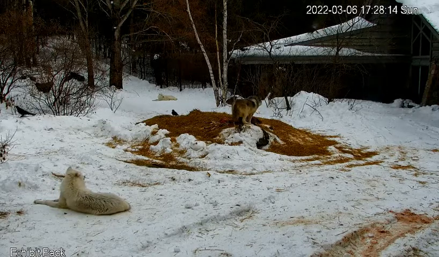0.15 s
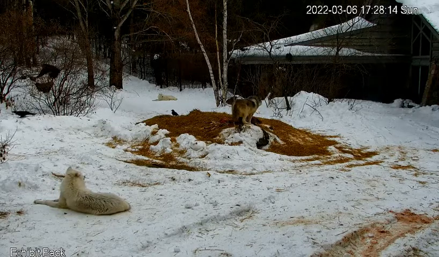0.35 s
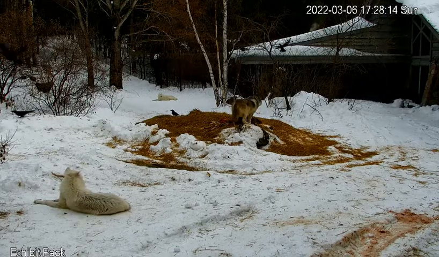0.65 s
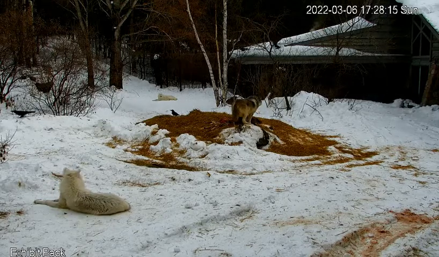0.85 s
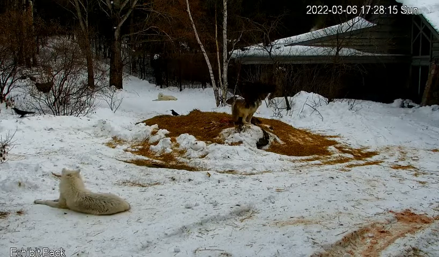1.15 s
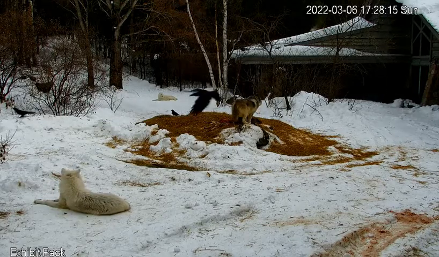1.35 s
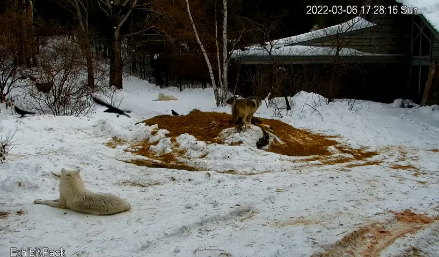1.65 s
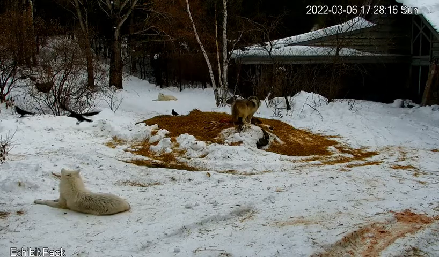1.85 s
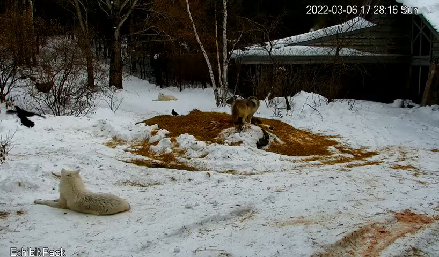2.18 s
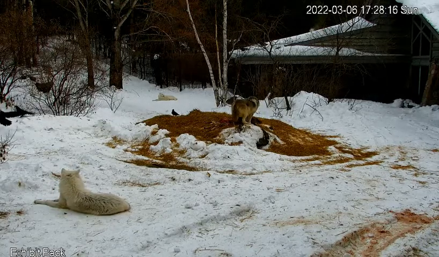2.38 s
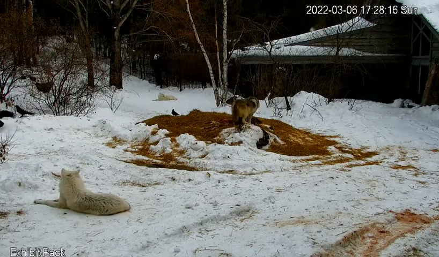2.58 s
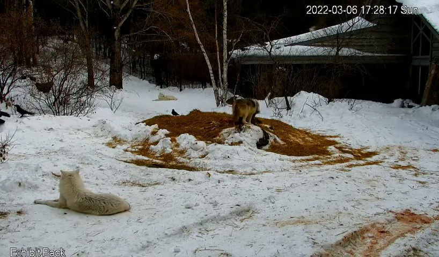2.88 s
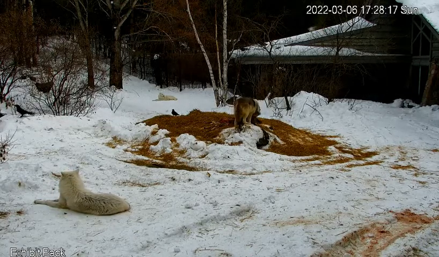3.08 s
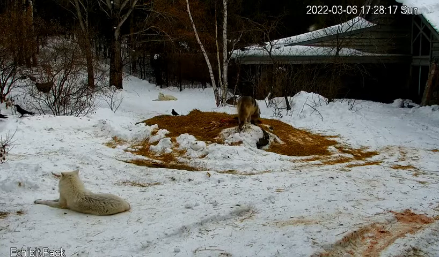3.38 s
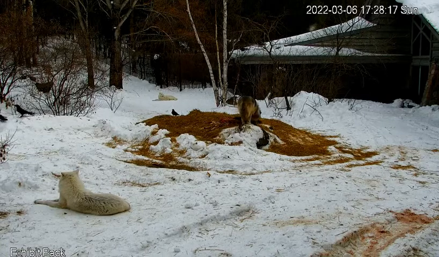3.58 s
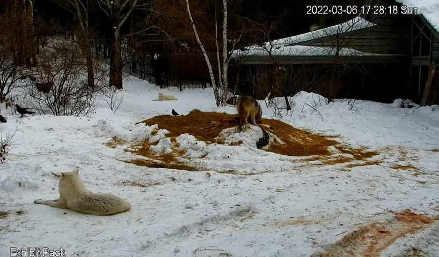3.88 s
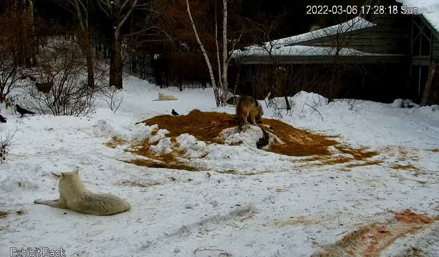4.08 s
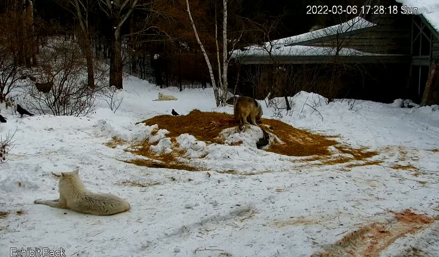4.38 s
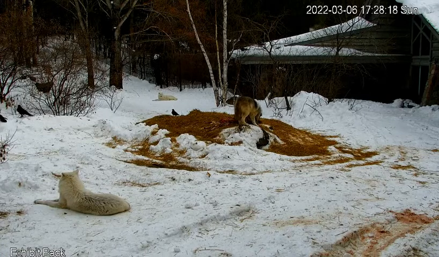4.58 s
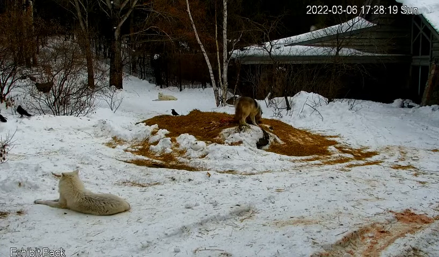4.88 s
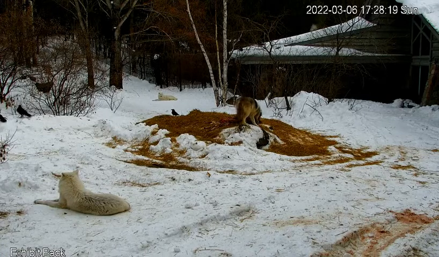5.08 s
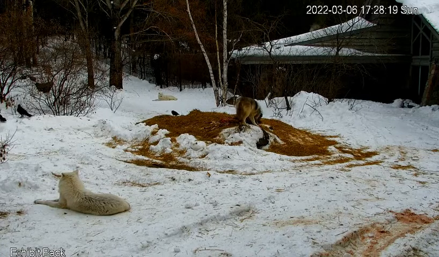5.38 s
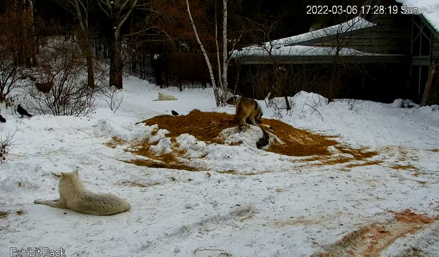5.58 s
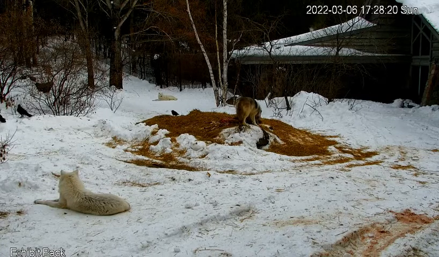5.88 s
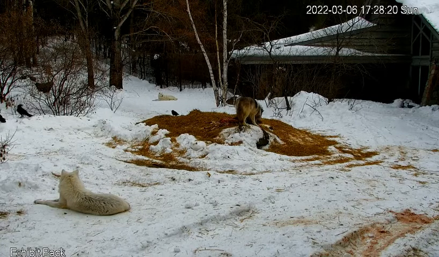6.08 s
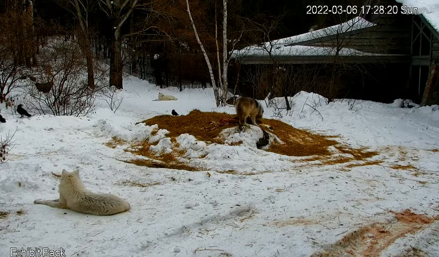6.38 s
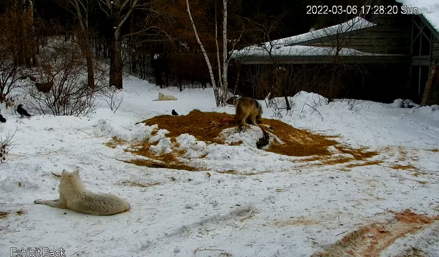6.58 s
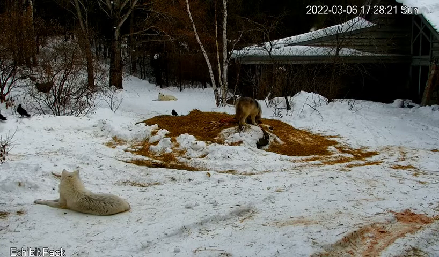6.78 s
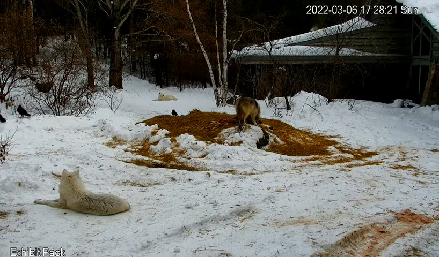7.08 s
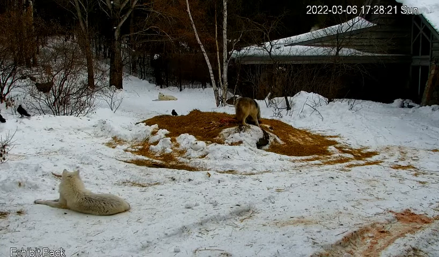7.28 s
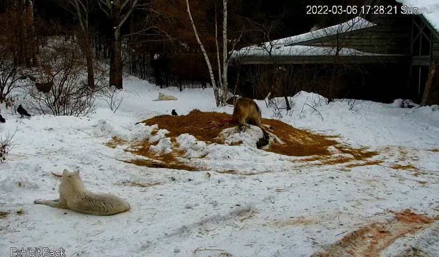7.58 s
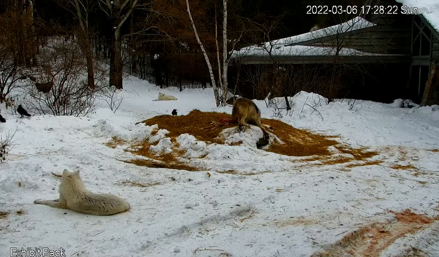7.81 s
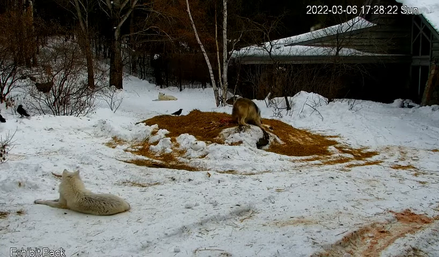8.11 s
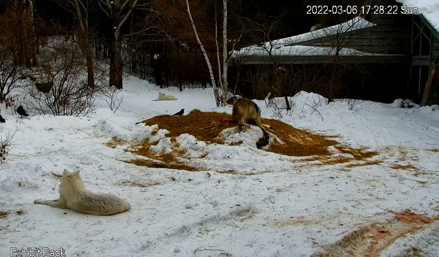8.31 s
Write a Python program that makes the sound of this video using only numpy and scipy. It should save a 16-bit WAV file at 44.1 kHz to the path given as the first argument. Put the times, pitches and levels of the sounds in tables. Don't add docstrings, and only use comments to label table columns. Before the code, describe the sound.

A fixed outdoor microphone picks up quiet hiss, far road rumble and a slight breeze. Two clear raven croaks ring off trees and walls, then wings flutter past with pecks and knocks. The raven resumes with an uneven run of eight short calls, dipping soft and hoarse before ending loud. Small feather rustles and a few knocks punctuate it, over a barely audible distant howl.

```python
import sys
import numpy as np
from scipy import signal
from scipy.fft import rfft, irfft
from scipy.io import wavfile
from scipy.ndimage import uniform_filter1d, map_coordinates

SR = 44100
rng = np.random.default_rng(int(sys.argv[2]) if len(sys.argv) > 2 else 0)


def generate_wav(signal):
    frames = np.transpose(np.atleast_2d(signal))
    scaled = np.clip(frames, -1, 1) * 32767
    pcm = np.round(scaled).astype(np.int16)
    wavfile.write(sys.argv[1], SR, pcm)


def rack_gain(trim_db):
    fader = np.asarray(trim_db, float)
    return 10 ** (fader / 20)


N = 372644


def unit(x):
    return x / np.sqrt(np.mean(x ** 2) + 1e-20)


def along(points, hz):
    point_hz, value = np.transpose(points)
    return np.interp(np.log(hz + 1), np.log(point_hz + 1), value)


def coloured(x, gain_db):
    hz = np.fft.rfftfreq(len(x), 1 / SR)
    return irfft(rfft(x) * rack_gain(gain_db(hz)), len(x))


def wobble(n, rate_hz):
    knots = rng.standard_normal(max(256, int(n * rate_hz / SR) + 4))
    return map_coordinates(knots, [np.arange(n) * rate_hz / SR])


def add(track, start, x):
    track[start:start + len(x)] += x[:len(track) - start]


def patches(shape, bands, frames):
    field = uniform_filter1d(rng.standard_normal(shape), size=bands, axis=0)
    return unit(uniform_filter1d(field, size=frames, axis=1))


def rush(spectrum, patchy_db):
    hz, _, z = signal.stft(rng.standard_normal(N), SR, nperseg=1024)
    gain_db = patchy_db * patches(z.shape, 8, 5) + along(spectrum, hz)[:, None]
    return unit(signal.istft(z * rack_gain(gain_db), nperseg=1024)[1][:N])


def stirring():
    t = np.arange(N) / SR
    lag_s, spread_s = 0.12, 0.17
    return np.tanh(sum(np.exp(-((t - s - lag_s) / spread_s) ** 2) for s, *_ in RAVEN_CROAKS + WING_STROKES))


# freq_hz [Hz], density_db [dB per Hz]
TRAFFIC_SPECTRUM = [(12, -50), (20, -12.5), (75, -27), (130, -2.5), (171, -12.5), (242, -4.5), (305, -15.5),
                    (452, 1.5), (508, -7.5), (735, -5), (1850, -18.5), (3150, -32), (5000, -37.5),
                    (6500, -63), (11000, -120)]


def traffic(stir):
    level_db = -55 + 2.2 * stir + 1.1 * wobble(N, 18)
    return rack_gain(level_db) * rush(TRAFFIC_SPECTRUM, patchy_db=2)


# freq_hz [Hz], density_db [dB per Hz]
BREEZE_SPECTRUM = [(15, -17.5), (40, -12), (130, -13), (300, -5), (600, -32), (1200, -75.5)]


def breeze(stir):
    level_db = -74 + 8.7 * stir + 4.6 * wobble(N, 18)
    return rack_gain(level_db) * rush(BREEZE_SPECTRUM, patchy_db=3.5)


# freq_hz [Hz], density_db [dB per Hz]
HISS_SPECTRUM = [(1470, -39), (2500, -11.5), (3900, -8), (5290, -8.5), (6210, -7), (8310, -7), (15600, -9)]


def hiss(stir):
    grain_db = 1.5 * wobble(N, 35) + 1.1 * wobble(N, 70)
    return rack_gain(-69.5 + 2.5 * stir + grain_db) * rush(HISS_SPECTRUM, patchy_db=2)


def air():
    stir = stirring()
    return traffic(stir) + breeze(stir) + hiss(stir)


# start_drop [share of pitch], end_drop [share], plateau_lean [share],
# release_db [dB], effort_growth_db [dB]
CROAK_ARCHES = [(.29, .27, -.04, 13.5, 1), (0.23, 0.31, -.01, 19, -2), (0.15, .27, -.06, 26.5, 2),
                (0.51, .3, -0.051, 32, -0.5), (0.0935, 0.044, .04, 31.5, 4.5),
                (0.34, 0.32, 0.029, 22.5, 1.5), (.25, .24, -.08, 31, 5.5), (0.28, .26, .005, 14.5, -1.5),
                (0.27, .21, -0.023, 29, 4.5), (.2, .22, 0.019, 22.5, 1)]
# time_s [s], pitch_drop [share], width_s [s]
VOICE_SLIP = (4.762, .08, .022)


def arch(start_s, length_s, plateau_hz, effort_db, rise_s, start_drop, end_drop, lean, release_db, growth_db):
    t = np.arange(round(length_s * SR)) / SR
    side = t / length_s - 0.5
    fall_s, fall_power = 0.068, 2.2
    fall = np.clip(1 - (length_s - t) / fall_s, 0, 1) ** fall_power
    bend = start_drop * np.exp(-t / rise_s) + end_drop * fall
    slip_s, slip_share, slip_width_s = VOICE_SLIP
    slip = slip_share * np.exp(-((start_s + t - slip_s) / slip_width_s) ** 2)
    attack_db = 27 * np.exp(-t / (0.35 * rise_s))
    letting_go_db = release_db * np.exp((t - length_s) / 0.018)
    pitch_hz = plateau_hz * (1 + lean * side - bend - slip)
    return pitch_hz, effort_db + 2 * growth_db * side - (attack_db + letting_go_db)


# multiple [of pitch], level_db [dB re second]
SYRINX_OVERTONES = [(4, -16.5), (5, -24), (6, -31), (7, -50.5), (8, -53), (9, -57.5), (10, -65.5),
                    (11, -65.5)]


def overtones_of(pitch_hz, first_db, third_db, tilt_db, beak_hz, beak_db):
    stack = [(1, first_db), (2, 0), (3, third_db)]
    for k, level_db in SYRINX_OVERTONES:
        resonance_db = beak_db * np.exp(-((k * pitch_hz - beak_hz) / 480) ** 2)
        stack.append((k, level_db + tilt_db * (k - 3) + resonance_db))
    return stack


# freq_hz [Hz], t60_s [s]
YARD_DECAY = [(500, 0.26), (1600, 0.57), (3200, 0.49), (6000, 0.32)]
# freq_hz [Hz], gain_db [dB]
ECHO_COLOUR = [(500, -7), (900, 2), (1600, 2.5), (3000, 0), (5000, -1.5), (8000, 3)]


def echoes(x, farthest_s):
    hz, t, z = signal.stft(rng.standard_normal(SR), SR, nperseg=256)
    decay_db = -60 * t / along(YARD_DECAY, hz)[:, None]
    tail = signal.istft(z * rack_gain(decay_db), SR, nperseg=256)[1]
    t = np.arange(len(tail)) / SR
    clumps_db = 3 * wobble(len(tail), 70)
    beyond_db = -14 / (1 + np.exp((farthest_s - t) / 0.062))
    open_snow = 1 - np.exp(-(t / 0.022) ** 2)
    tail = tail * rack_gain(clumps_db + beyond_db) * open_snow
    tail = coloured(tail / np.linalg.norm(tail), lambda hz: along(ECHO_COLOUR, hz))
    return signal.fftconvolve(x, tail)


# first_swell_s [s], length_s [s], period_s [s], swell_db [dB]
ECHO_BEATS = [
    (.921, .115, .0272, 6.5),
    (1.525, .1, .032, 5),
    (3.79, .11, .035, 5),
    (4.88, .085, .04, 5),
    (5.378, .05, .052, 12),
    (6.093, .16, .0388, 11),
    (6.8, .14, .0345, 7.5),
    (7.429, .095, .045, 5),
]


def shimmer(x, depth_db):
    hz, t, z = signal.stft(x, SR, nperseg=256)
    fading_db = depth_db * patches(z.shape, 4, 5)
    swells_db = -6.5
    for first_s, length_s, period_s, swell_db in ECHO_BEATS:
        off_step_s = (t - first_s + period_s / 2) % period_s - period_s / 2
        in_step = np.exp(-(off_step_s / 0.009) ** 2)
        active = np.abs(t - first_s - length_s / 2) < (length_s + period_s) / 2
        growing_db = swell_db + 27.5 * (t - first_s)
        swells_db = swells_db + growing_db * in_step * active
    loudest_overtone = np.exp(-((hz[:, None] - 1550) / 600) ** 2)
    gain_db = fading_db + loudest_overtone * swells_db - 3.5
    return signal.istft(z * rack_gain(gain_db), nperseg=256)[1][:N]


# start_s [s], length_s [s], pitch_hz [Hz], effort_db [dB], rise_s [s]
RAVEN_CROAKS = [
    (0.714, 0.18, 866, -22.5, 0.028),
    (1.353, 0.15, 777.8, -25, 0.015),
    (3.59, 0.18, 806.7, -22.5, .011),
    (4.188, .19, 791, -30, 0.015),
    (4.71, 0.16, 666.7, -30.5, 0.008),
    (5.124, 0.17, 798.6, -25, 0.02),
    (5.462, .165, 796.4, -24.5, .025),
    (5.93, 0.14, 784.5, -25.5, .017),
    (6.643, 0.14, 797.8, -22, 0.011),
    (7.236, 0.16, 800.7, -22, 0.012),
]
# first_db [dB], third_db [dB], tilt_db [dB per multiple],
# resonance_hz [Hz], resonance_db [dB]
BEAK_SHAPES = [(-13.5, -19, -3.5, 4110, 9.5), (-11, -21, -2.5, 3440, 2.5), (-12, -14.5, .8, 5800, 21),
               (-17.5, -24.5, -3.5, 4850, 1), (-6.5, -6, 4, 4530, 25.5), (-7, -12, -0.3, 3200, 1),
               (-8.5, -13.5, 0, 4600, 8), (-10, -14, 0.5, 4650, 6), (-7.5, -35.5, -4, 5070, 15.5),
               (-6.5, -20.5, 0, 3150, 2)]
HOARSENESS = [.045, .035, .04, .085, .065, .05, .09, .035, .035, .042]
# depth [0-1], rate_hz [Hz]
MEMBRANE_BEATS = [(0, 100), (0, 100), (0, 100), (.3, 95), (.1, 100), (.15, 70), (.45, 100), (0, 100),
                  (0, 100), (0, 100)]
# echo_db [dB], treble_loss_db [dB per kHz over 3 kHz], farthest_echo_s [s], rasp_db [dB]
HEADINGS = [(-4, 4, 0.11, -30), (-2.5, 12, 0.31, -45), (-5.5, 2.5, 0.3, -47), (-13.5, 2.5, 0.085, -40),
            (-5.5, 5.5, 0.2, -18), (-6, 5, 0.31, -31), (-7.5, 19.5, 0.2, -32.5), (-6.5, 23.5, 0.31, -38.5),
            (-5, 21, 0.29, -36.5), (-7.5, 0.5, 0.16, -30.5)]
# freq_hz [Hz], gain_db [dB]
RASP_SPECTRUM = [(1500, -37.5), (3000, -9.5), (4000, -3), (4700, 0), (5700, -6.5), (6500, -19.5),
                 (9000, -30), (15000, -42)]


def syrinx(hz, effort_db, overtones, hoarse, beat_depth, beat_hz):
    n = len(hz)
    phase = 2 * np.pi * np.cumsum(hz) / SR
    closing_db = 0.24 * (effort_db - effort_db.max())
    voice = np.zeros(n)
    for k, level_db in overtones:
        closes = 3 if k == 1 else k - 1
        gain_db = level_db + closes * closing_db + 1.02 * k * wobble(n, 55.9)
        jitter = 0.6 * hoarse * k * k * wobble(n, 140)
        voice += rack_gain(gain_db) * np.sin(k * phase + k * k + jitter)
    voice = voice * (1 + 4.9 * hoarse * wobble(n, 253.9) + 2.85 * hoarse * wobble(n, 900))
    beat = 2 * np.pi * np.cumsum(beat_hz * (1 + 0.064 * wobble(n, 47))) / SR
    voice = voice * (1 + beat_depth * np.hanning(n) ** 0.5 * np.cos(beat))
    return 1.705 * rack_gain(effort_db) * voice


def throat_rasp(hz, level_db):
    n = len(hz)
    phase = 2 * np.pi * np.cumsum(hz) / SR
    noise = coloured(rng.standard_normal(SR // 2)[:n], lambda hz: along(RASP_SPECTRUM, hz))
    breath = unit(noise) * (1 + np.cos(phase))
    return rack_gain(level_db - 2 + 6.7 * wobble(n, 90)) * np.linspace(0, 2, n) * breath


def raven():
    direct, returned = np.zeros(N), np.zeros(N)
    croaks = zip(RAVEN_CROAKS, CROAK_ARCHES, BEAK_SHAPES, HOARSENESS, MEMBRANE_BEATS, HEADINGS)
    for row, shape, beak, hoarse, (beat_depth, beat_hz), heading in croaks:
        echo_db, treble_loss_db, farthest_s, rasp_db = heading
        start = round(row[0] * SR)
        hz, effort_db = arch(*row, *shape)
        n = len(hz)
        hz = hz * (1 + 0.16 * hoarse * wobble(n, 153.5))
        voice = syrinx(hz, effort_db, overtones_of(row[2], *beak), hoarse, beat_depth, beat_hz)
        rasp = throat_rasp(hz, effort_db + rasp_db)
        croak = np.pad(voice, (0, 400))
        add(direct, start, coloured(croak, lambda hz: -treble_loss_db * np.clip(hz / 1e3 - 3, 0, 4)))
        add(direct, start, 0.15 * rasp)
        sent = croak * np.pad((hz / hz.max()) ** 3.8, (0, 400))
        add(sent, 0, rasp)
        add(returned, start, rack_gain(echo_db) * echoes(sent, farthest_s))
    return direct + shimmer(returned, depth_db=3)


# start_s [s], peak_db [dB], pitch_hz [Hz], t60_s [s]
KNOCKS = [
    (1.549, -34.5, 750, 0.075),
    (1.818, -45.5, 142, 0.096),
    (1.911, -45, 140, 0.14),
    (2.314, -63, 400, 0.042),
    (2.425, -41, 725, 0.051),
    (2.452, -37.5, 450, 0.091),
    (2.599, -44, 685, 0.036),
    (3.76, -37.5, 421, 0.16),
    (5.143, -36.5, 760, 0.049),
    (7.968, -42.5, 790, 0.039),
]


def knocks():
    out, t = np.zeros(N), np.arange(SR // 5) / SR
    for start_s, peak_db, pitch_hz, t60_s in KNOCKS:
        modes = np.sin(2 * np.pi * pitch_hz * t) + 0.55 * np.sin(2 * np.pi * 1.8 * pitch_hz * t)
        onset = 1 - np.exp(-t / 0.00071)
        add(out, round(start_s * SR), rack_gain(peak_db + 2 - 60 * t / t60_s) * modes * onset)
    return out


# peak_s [s], level_db [dB]
WING_STROKES = [
    (1.758, -62),
    (1.938, -68),
    (2.322, -50),
    (2.452, -48),
    (2.58, -60),
    (2.798, -55),
    (2.924, -52),
]
# middle_s [s], half_length_s [s], level_db [dB]
SETTLING = (2.74, 0.24, -57.5)
# freq_hz [Hz], gain_db [dB]
WING_SPECTRUM = [(200, -34), (500, -26), (900, 5.5), (2000, 1), (4000, -15.5), (8000, -18.5), (15000, -25),
                 (16000, -77)]


def flapping():
    t = np.arange(N) / SR
    rise_s, fall_s = 0.013, 0.024
    strokes = np.zeros(N)
    for peak_s, level_db in WING_STROKES:
        strokes += rack_gain(level_db) * np.exp(-np.abs(t - peak_s) / np.where(t < peak_s, rise_s, fall_s))
    middle_s, half_length_s, settling_db = SETTLING
    settling = rack_gain(settling_db) * np.exp(-((t - middle_s) / half_length_s) ** 2)
    crackle_db = 3 * wobble(N, 45) + 3 * wobble(N, 300)
    puffs = unit(rack_gain(crackle_db) * rush(WING_SPECTRUM, patchy_db=3))
    return rack_gain(-5) * puffs * (strokes + settling)


# start_s [s], peak_db [dB], length_s [s]
FEATHER_STROKES = [
    (1.848, -64, 0.034),
    (2.391, -55, 0.049),
    (2.627, -71, 0.032),
    (2.811, -62, 0.023),
    (2.912, -76, 0.034),
    (4.347, -70, 0.026),
    (5.705, -44.5, 0.019),
    (6.153, -50.5, 0.031),
    (6.237, -62, 0.051),
    (7.414, -61, 0.027),
]
# freq_hz [Hz], gain_db [dB]
FEATHER_SPECTRUM = [(300, -43), (2000, -16), (6000, -9), (9000, -5), (11500, -1), (13500, -22),
                    (15700, -25.5), (16000, -83)]


def rustles():
    out, t = np.zeros(N), np.arange(SR // 5) / SR
    for start_s, peak_db, length_s in FEATHER_STROKES:
        noise = unit(coloured(rng.standard_normal(len(t)), lambda hz: along(FEATHER_SPECTRUM, hz)))
        stroke = t / length_s * np.exp(1 - t / length_s * 2)
        level_db = peak_db - 7.5 + 4.5 * wobble(len(t), 200)
        add(out, round(start_s * SR), rack_gain(level_db) * noise * stroke)
    return out


# start_s [s], length_s [s], pitch_hz [Hz], first_db [dB], second_db [dB]
HOWL_PHRASES = [
    (3.55, 0.93, 241, -64, -56),
    (4.4, 0.44, 244, -75, -58.5),
    (5.07, 0.75, 230, -66.5, -49.5),
    (5.6, 0.85, 240.4, -64, -55.5),
    (6.599, .36, 228.3, -73, -47.5),
    (7.262, 0.72, 215.8, -73, -51.5),
    (7.85, 0.54, 230, -66, -57.5),
]


def howls():
    out = np.zeros(N)
    for start_s, length_s, pitch_hz, first_db, second_db in HOWL_PHRASES:
        n = round(length_s * SR)
        t = np.arange(n) / SR
        glide_hz = pitch_hz + 10.38 * t
        phase = 2 * np.pi * np.cumsum(glide_hz * (1 + 0.0077 * wobble(n, 25))) / SR
        first_fade, second_fade = 1 + 0.6 * wobble(n, 16), 0.4 + wobble(n, 24)
        first = 1.58 * rack_gain(first_db) * first_fade * np.sin(phase)
        second = 1.14 * rack_gain(second_db - 2.5 * t) * second_fade * np.sin(2 * phase)
        add(out, round(start_s * SR), (first + second) * signal.windows.tukey(n, 0.34))
    return out


def scene():
    return (raven() + howls() + knocks() + rustles() + flapping() + air())[None]


def band_limit(x):
    return signal.sosfilt(signal.butter(12, 15700, fs=SR, output="sos"), x)


# start_s [s], end_s [s]
LOST_SAMPLES = (3.6512, 3.6594)


def record(dry):
    t = np.arange(N) / SR
    bent = dry + 0.1 * (dry ** 2 - uniform_filter1d(dry ** 2, size=2500))
    lost = (t > LOST_SAMPLES[0]) & (t < LOST_SAMPLES[1])
    kept = uniform_filter1d(np.where(lost, rack_gain(-34), 1.0), size=2)
    return band_limit(bent * kept)


dry = scene()
out = record(dry)
generate_wav(out)
```